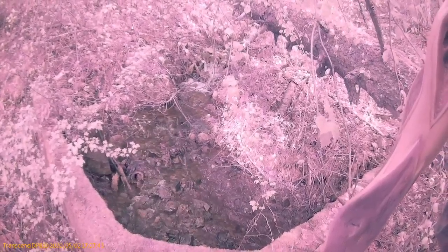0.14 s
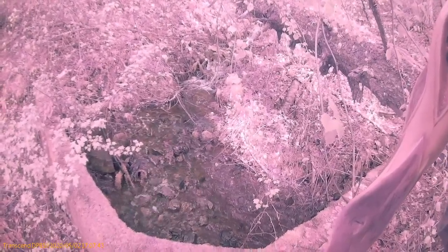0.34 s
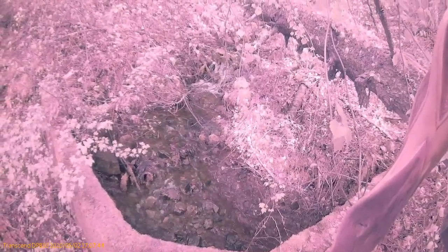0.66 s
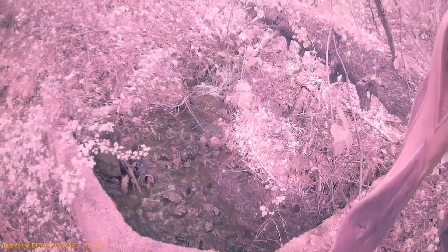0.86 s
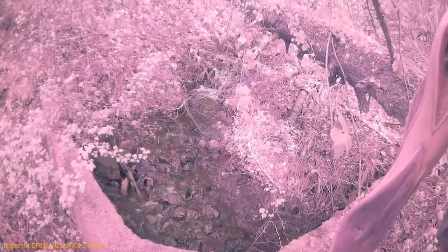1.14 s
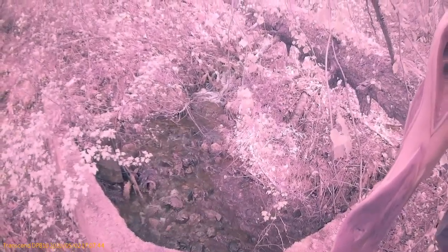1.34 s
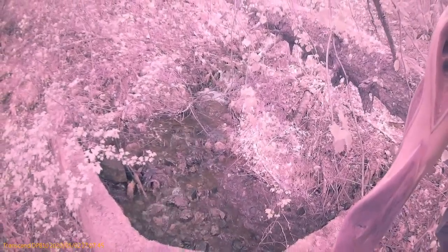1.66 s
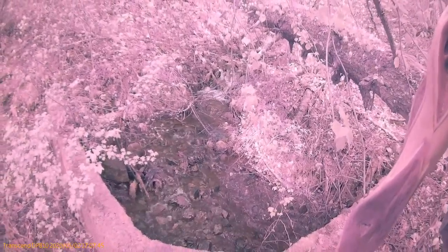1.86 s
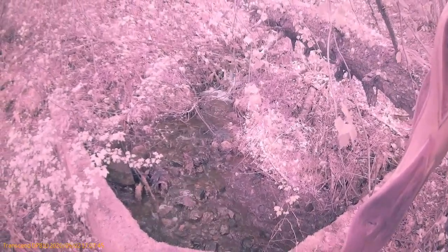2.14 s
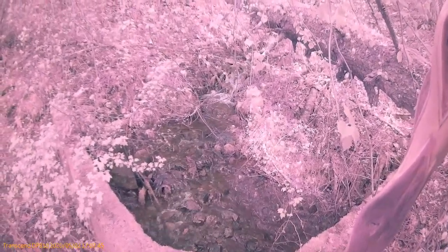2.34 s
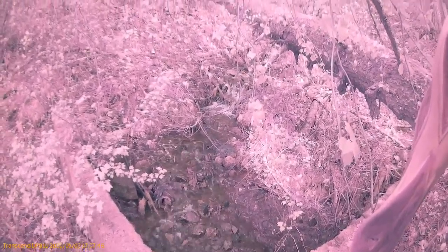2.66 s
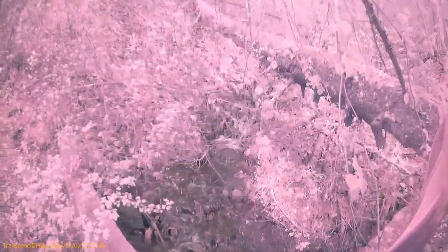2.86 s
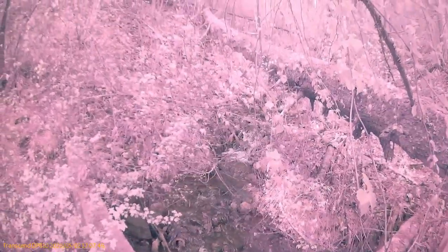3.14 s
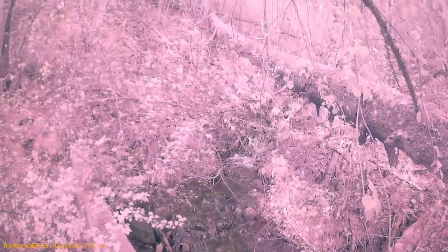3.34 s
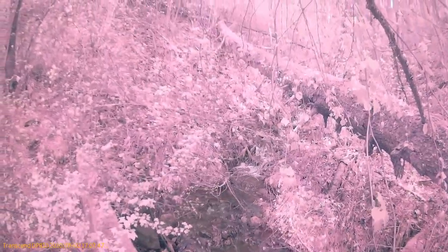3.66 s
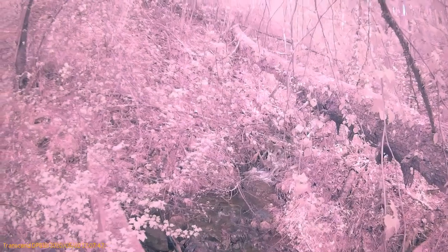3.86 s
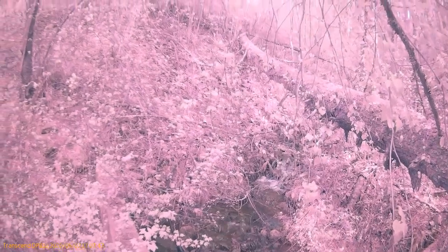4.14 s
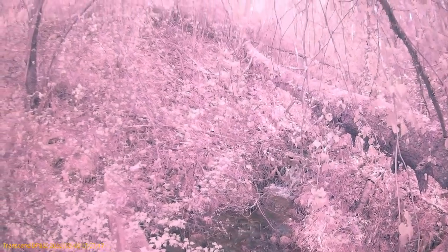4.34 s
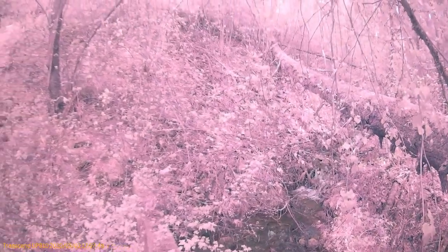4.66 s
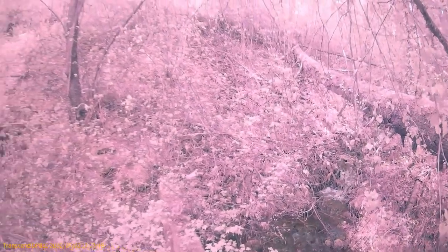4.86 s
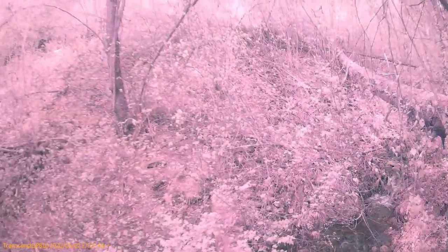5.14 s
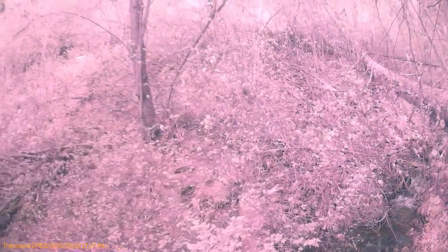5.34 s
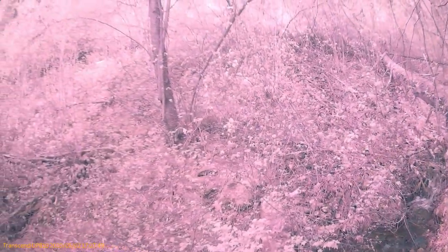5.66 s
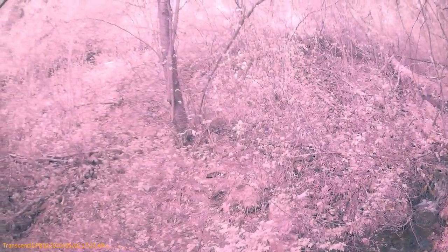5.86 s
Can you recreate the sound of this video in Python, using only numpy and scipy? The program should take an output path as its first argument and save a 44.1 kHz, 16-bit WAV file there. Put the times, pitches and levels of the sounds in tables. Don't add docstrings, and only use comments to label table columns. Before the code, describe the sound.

Close, mono outdoor sound of a little stream among brush. A continuous bright fizz sits over a softer mid-pitched gurgle, dotted by single bubbles and very short high drips. The hand makes low swaying thumps and faint skin rubs. A hard clack with a low push of air comes at about 2.8 seconds, a light tap near 4.9, then the water's spray dips suddenly around 5.6 and partly returns.

```python
import sys
import numpy as np
from scipy import signal
from scipy.fft import rfft, irfft, next_fast_len
from scipy.io import wavfile
from scipy.ndimage import uniform_filter1d, map_coordinates

SR = 44100
rng = np.random.default_rng(int(sys.argv[2]) if len(sys.argv) > 2 else 0)


def pcm_store(signal):
    levels = np.round(np.clip(np.atleast_2d(signal), -1, 1) * 32767)
    wavfile.write(sys.argv[1], SR, levels.astype(np.int16).T)


def elevation(decibels):
    levels = np.asarray(decibels, float)
    return 10 ** (levels / 20)


N = 264585


def unit(x):
    return x / np.sqrt(np.mean(x ** 2) + 1e-20)


def curves(rows):
    times, *columns = np.transpose(rows)
    return [np.interp(np.arange(N) / SR, times, column) for column in columns]


def wobble(rate):
    knots = rng.standard_normal(int(N * rate / SR) + 4)
    return map_coordinates(knots, [np.arange(N) * rate / SR])


def coloured(x, spectrum):
    m = next_fast_len(N + 8192)
    hz, db = np.transpose(spectrum)
    gain = elevation(np.interp(np.log(np.fft.rfftfreq(m, 1 / SR) + 1), np.log(hz + 1), db))
    return irfft(rfft(x, m) * gain, m)[:N]


def patchy(depth_db):
    z = signal.stft(rng.standard_normal(N + 512), nperseg=256)[2]
    field = uniform_filter1d(rng.standard_normal(z.shape), size=14, axis=0)
    field = uniform_filter1d(field, size=6, axis=1)
    return signal.istft(z * elevation(depth_db * unit(field)), nperseg=256)[1][:N]


def overlap(start_s, waves, total):
    where = np.maximum((start_s * SR).astype(int), 0)[:, None] + np.arange(waves.shape[1])
    return np.bincount(where.ravel(), waves.ravel(), total)[:N]


def rings(s, gain, hz, t60, rise, size, sharp=2.3):
    t = np.arange(size) / SR
    life = t / t60[:, None]
    phase = 2 * np.pi * hz[:, None] * t * (1 + rise * np.minimum(life, 1))
    onset = 1 - np.exp(-t * hz[:, None] * sharp)
    waves = gain[:, None] * elevation(-60 * life) * onset * np.sin(phase)
    return overlap(s, waves, N + size + 1)


def swarm(count, low_hz, high_hz, cycles, spread_db, rise, size):
    u = rng.random((count, 3))
    hz = low_hz * (high_hz / low_hz) ** u[:, 1]
    gain = elevation(-spread_db * np.log(u[:, 2] + 1 / 200))
    return rings(u[:, 0] * N / SR, gain, hz, cycles / hz, rise, size)


# time in seconds, spray level in dB, share turned away 0-1.
FLOW = [
    (0, -35.5, 0.34),
    (.8, -35, 0.42),
    (3.5, -35.5, 0.35),
    (4.8, -35.5, 0.62),
    (5.3, -36.5, 0.78),
    (5.556, -37.5, 0.9),
    (5.57, -42, .7),
    (5.82, -44, 0.72),
    (6, -39, 0.8),
]
# Hz, density in dB per Hz.
SPRAY_FACED = [(880, -14), (1500, -17), (1740, 0.5), (2350, 2), (4540, -6), (7410, -4), (9650, 1.5),
               (10500, 2), (13900, -13), (15600, -16)]
SPRAY_AWAY = [(880, 1), (1500, 3.5), (1810, -8), (2160, -1), (2650, -5.5), (4200, -1), (6990, -1.5),
              (8580, -0.5), (9650, 3), (11300, -5), (12700, -9), (15000, -15.5), (15600, -22)]
GURGLE = [(120, -18.5), (200, -8.5), (433, -1), (502, -2), (895, 0.5), (1350, -3), (1580, -7.5),
          (1800, -14), (2340, -11.5), (3960, -120)]
# frequency in Hz, gain in dB.
FLARE = [(2500, -38), (4500, -4), (7000, -6.5), (16000, 7)]


def creek():
    spray_db, turned = curves(FLOW)
    turned = np.clip(turned, 0, 1)
    gurgle_db = -47 + 0.63 * (spray_db - spray_db[0]) - 0.5 * (turned - turned[0])
    flare = bursts()

    fizz = swarm(count=12000, low_hz=2720, high_hz=14300, cycles=21, spread_db=2.0, rise=0.21, size=250)
    crackle = swarm(count=2500, low_hz=6800, high_hz=14800, cycles=6.1, spread_db=3.0, rise=0, size=40)
    hiss = unit(patchy(1.12))
    hiss += elevation(-7.5) * unit(np.gradient(fizz))
    hiss += elevation(-9.5) * unit(crackle) * flare
    hiss *= elevation(0.09 * wobble(16) + 0.31 * wobble(35))
    hiss += (flare - 1) * coloured(hiss, FLARE)
    faced = unit(coloured(hiss, SPRAY_FACED))
    away = unit(coloured(hiss, SPRAY_AWAY))
    spray = (1 - turned) * faced + turned * away

    glug = swarm(count=1500, low_hz=291.0, high_hz=1736, cycles=25, spread_db=2.5, rise=0.3, size=2000)
    gurgle = unit(coloured(patchy(1.0), GURGLE)) + elevation(-6.5) * unit(glug)
    return elevation(spray_db - 0.75) * spray + elevation(gurgle_db + wobble(11) / 2) * unit(gurgle)


# centre in seconds, swell in dB, half width in seconds.
SPLASHES = [(.1, 1, 0.0091), (.415, 2, 0.0088), (.7, 5, 0.0062), (.75, 2.5, 0.0092), (.91, -0.5, 0.0086),
            (1.165, 2.5, .01), (1.25, 1.5, 0.0071), (1.72, 2.5, 0.013), (2.125, 1, 0.015),
            (2.355, 3, 0.0071), (2.51, 0.5, 0.0087), (2.8, -3, 0.0074), (2.88, 3, 0.027),
            (3.229, 6.5, 0.0051), (3.31, 2, 0.0075), (3.453, 5, 0.0065), (4.415, 3.5, 0.0047),
            (4.95, 0.5, .012), (5.065, 2, .01), (5.35, 3, 0.011), (5.845, 4.5, .008)]


def bursts():
    t = np.arange(N) / SR
    return elevation(sum(db * np.exp(-((t - s) / width) ** 2) for s, db, width in SPLASHES))


# centre in seconds, sway in dB, bump in dB, half length in seconds.
MOVES = [(0.17, -50, -66, 0.081), (0.362, -40.5, -60, 0.089), (0.945, -36.5, -70, 0.043),
         (1.293, -42, -64, 0.11), (1.537, -39.5, -64, 0.14), (1.97, -46.5, -50, .12),
         (2.108, -67, -47, 0.092), (2.242, -37.5, -50, 0.045), (2.48, -42, -68, 0.098),
         (2.68, -40.5, -53, .1), (3.26, -66, -56, 0.22), (3.47, -46, -70, 0.057), (3.62, -49, -57, 0.033),
         (4.108, -42.5, -69, 0.032), (4.27, -64, -49, 0.062), (4.47, -55, -49, 0.069),
         (4.72, -42, -56, 0.035), (4.97, -58, -63, 0.092), (5.09, -57, -59, 0.054), (5.332, -55, -59, .05),
         (5.444, -50, -48, .04), (5.513, -50, -49, .03), (5.793, -71, -53, 0.055), (6, -42, -64, 0.062)]


def wrist():
    t = np.arange(N) / SR
    sway, bump = elevation(-55), elevation(-73)
    for s, sway_db, bump_db, half in MOVES:
        shape = elevation(-11.5 * np.abs(t - s) / half)
        sway = sway + elevation(sway_db) * shape
        bump = bump + elevation(bump_db) * shape
    return sway, bump


# time in seconds, level in dB.
GRIP = [(0, -61.5), (.7, -70), (1.82, -66), (1.99, -53), (2.3, -60), (2.6, -70), (2.78, -45), (2.97, -53),
        (3.22, -49.5), (3.44, -63), (3.56, -52), (3.66, -72), (4.02, -67), (4.14, -51), (4.9, -54),
        (5.45, -57), (5.75, -57), (6, -52)]
# frequency in Hz, density in dB per Hz.
SWAY = [(4, -22), (10, 6), (25, -3), (50, -25.5), (80, -50), (200, -87)]
BUMP = [(30, -40), (52, 6.5), (80, 3), (110, -15), (170, -26.5)]
RUB = [(60, -20), (110, -9), (170, -5.5), (270, -9), (420, -11), (900, -63)]


def hand():
    swaying, bumping = wrist()
    rub_db = curves(GRIP)[0] + 3.5 * wobble(14)
    sway = unit(coloured(rng.standard_normal(N), SWAY))
    bump = unit(coloured(rng.standard_normal(N), BUMP))
    sway /= np.sqrt(np.abs(uniform_filter1d(sway ** 2, size=5000)) + 0.092)
    bump /= np.sqrt(np.abs(uniform_filter1d(bump ** 2, size=3000)) + 0.1)
    rub = unit(coloured(rng.standard_normal(N) * elevation(0.57 * wobble(30)), RUB))
    return elevation(4) * swaying * sway + bumping * bump + elevation(rub_db + 0.2) * rub


# start in seconds, peak
# in dB, frequency in Hz.
BUBBLES = [(0.03, -22, 4800), (.073, -28, 3700), (0.53, -27, 2200), (1.083, -27, 2700),
           (1.289, -28.5, 1090), (1.342, -21.5, 2800), (1.584, -24, 2530), (1.622, -25, 2920),
           (1.663, -24, 2380), (1.709, -25, 2680), (2.107, -34, 910), (2.242, -29, 2080), (2.35, -28, 2370),
           (2.594, -27, 3980), (3.152, -25.5, 1350), (3.176, -27.5, 1210), (3.364, -23, 2300),
           (3.565, -28.5, 960), (3.629, -28, 905), (3.7205, -19.5, 3750), (3.749, -30.5, 1260),
           (3.897, -25, 4130), (4.3, -28, 1250), (4.419, -22, 3980), (0.375, -17.5, 5200),
           (4.528, -33, 660), (4.915, -23.5, 1276), (4.958, -29, 4370), (4.98, -27, 980), (5.24, -20, 4430)]


def bubbles():
    s, db, hz = np.transpose(BUBBLES)
    t60 = 36 / hz
    u = rng.random((len(s), 2))
    plop = rings(s, elevation(db - 1.5), 0.938 * hz, t60, rise=0.2, size=3000, sharp=0.4)
    neighbour_hz = hz * (0.64 + 0.25 * u[:, 1])
    plop += rings(s + 0.0029 * u[:, 0], elevation(db - 17), neighbour_hz, 0.75 * t60, rise=0.3, size=3000)
    return plop


def far_drops(count):
    u = rng.random((count, 3))
    s = u[:, 0] * N / SR
    near_db = curves(FLOW)[0][(u[:, 0] * N).astype(int)] - FLOW[0][1]
    return np.c_[s, -27 + 5 * u[:, 1] + near_db, 8600 + 1600 * u[:, 2]]


# start in seconds, peak in dB, frequency in Hz.
DROPS = [(.0358, -20, 10000), (.1353, -18, 8700), (.2713, -18, 9600), (.4923, -21, 9550),
         (.415, -15.5, 9400), (.6195, -18, 8150), (.697, -30, 9800), (.745, -22, 10100), (.909, -17, 9500),
         (1.0311, -17, 9310), (1.1628, -19, 9710), (1.2431, -18, 9050), (1.5399, -22, 9000),
         (1.711, -9.5, 8660), (1.7754, -19, 9310), (1.943, -17, 9600), (2.13, -13, 9800),
         (2.5054, -22, 10100), (2.6324, -19, 6600), (2.796, -20, 10000), (2.8799, -23, 9800),
         (3.2276, -16, 9150), (3.449, -27, 9500), (3.932, -12, 8560), (4.4133, -16.5, 8060),
         (4.6349, -21, 8700), (5.064, -22, 9000), (5.4827, -18, 9830), (5.8434, -24, 9100),
         (5.942, -19.5, 8400)]
# frequency in Hz, gain in dB.
PORT = [(300, -22), (6000, 0), (9800, -2.5), (11500, 10.5), (14000, -12), (16000, -24)]


def drops():
    s, db, hz = np.concatenate([DROPS, far_drops(count=40)]).T
    t60 = np.full(len(s), 0.0053)
    u = rng.random((len(s), 3))
    tick = rings(s, elevation(db - 2.5), hz, t60, rise=-0.039, size=900)
    tick += rings(s, elevation(db - 14), hz * (0.98 + 0.19 * u[:, 0]), 0.14 * t60, rise=0, size=900)
    rebound_s = s + 0.0006 + 0.00083 * u[:, 1]
    tick += rings(rebound_s, elevation(db - 7.5), hz * (0.714 + 0.23 * u[:, 2]), t60, rise=0, size=900)
    return coloured(tick, PORT)


# time in seconds, peak in dB, Hz, life in cycles.
GULPS = [
    (.8698, -24, 1950, 20),
]


def gulps():
    s, db, hz, cycles = np.transpose(GULPS)
    t = np.arange(1500) / SR
    life = t * (hz / cycles)[:, None]
    phase = 2 * np.pi * cycles[:, None] * (0.55 * life + 0.2 * life ** 3)
    closing = np.cos(np.pi / 2 * (life / 1.1) ** 4) ** 2
    swell = np.where(life < 1.1, life ** 4 * closing, 0)
    waves = elevation(db)[:, None] * swell * np.sin(phase)
    return overlap(s - 0.9 * cycles / hz, waves, N + 1500)


# start in seconds, push of air in dB, shell in dB.
KNOCKS = [
    (2.775, -40, -40),
    (2.785, -40, -36),
    (2.7964, -12.5, -21.5),
    (2.79797, -30, -24),
    (2.8075, -40, -31),
    (2.8135, -40, -32),
    (2.878, -30, -36),
    (4.9145, -33, -35),
]
# frequency in Hz, level in dB, t60 in seconds.
SHELL = [(296, -1.5, 0.082), (744, -6, 0.034), (1420, -7, 0.038), (1923, 9.5, 0.006), (2740, 1, 0.007),
         (4170, -14, .006), (9800, -3, 0.0089)]


def knocks():
    out, t = np.zeros(N), np.arange(SR // 4) / SR
    for s, push_db, shell_db in KNOCKS:
        push = np.exp(-((t - 0.002) / 0.001) ** 2)
        recoil = -0.25 * np.sin(2 * np.pi * 7.6 * t + 0.5) * np.exp(-(t / 0.11) ** 4)
        recoil *= 1 - np.exp(-(t / 0.006) ** 2)
        ring = np.zeros(len(t))
        for hz, db, t60 in SHELL:
            ring += elevation(db + rng.normal(0, 2.0) - 60 * t / t60) * np.sin(2 * np.pi * hz * t)
        scrape = uniform_filter1d(rng.standard_normal(len(t)), size=7)
        scrape *= 1.6 * elevation(-60 * t / 0.06) + 3 * elevation(-60 * t / 0.0075)
        shell = (ring + scrape) * (1 - np.exp(-t / 0.0006))
        out[round(s * SR):][:len(t)] += elevation(push_db) * (push + recoil) + elevation(shell_db) * shell
    return out


def scene():
    mono = creek() + hand() + bubbles() + drops() + gulps() + knocks()
    return np.array([mono, mono])


def low_pass(x):
    return signal.sosfilt(signal.butter(12, 16150, fs=SR, output="sos"), x)


# frequency in Hz, gain in dB.
BAND_LIMIT = [(20, 0), (15700, 0), (15760, -90)]


def record(dry):
    mix = np.array([coloured(side, BAND_LIMIT) for side in dry])
    return low_pass(mix)


dry = scene()
out = record(dry)
pcm_store(out)
```